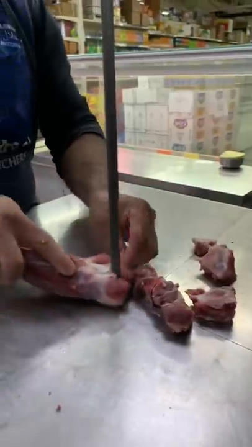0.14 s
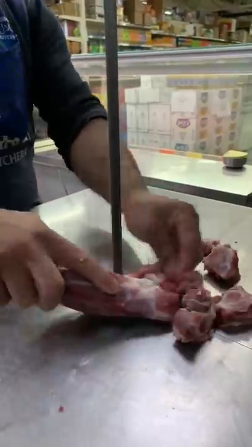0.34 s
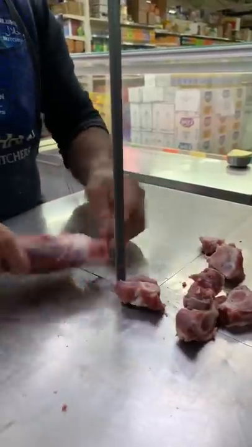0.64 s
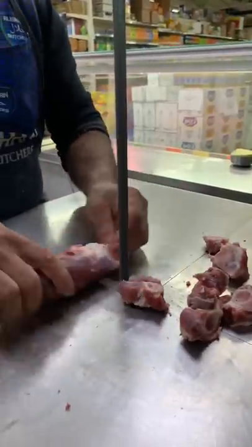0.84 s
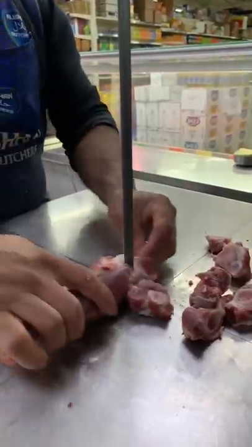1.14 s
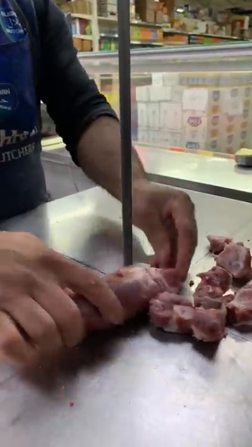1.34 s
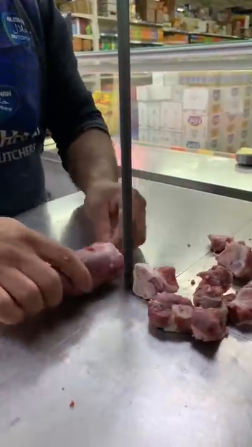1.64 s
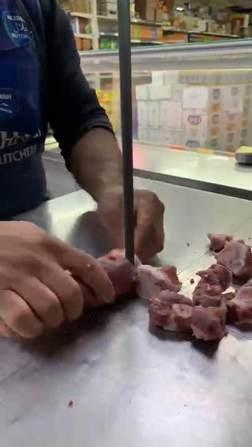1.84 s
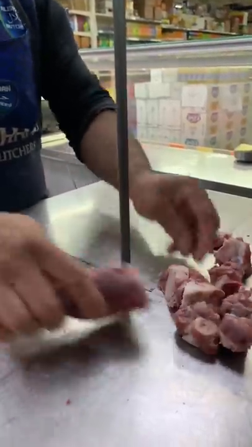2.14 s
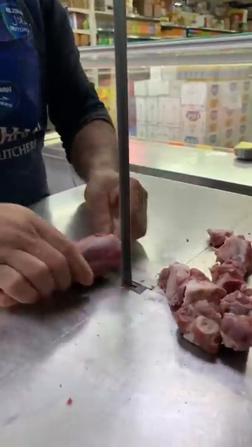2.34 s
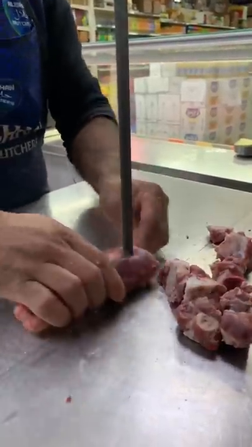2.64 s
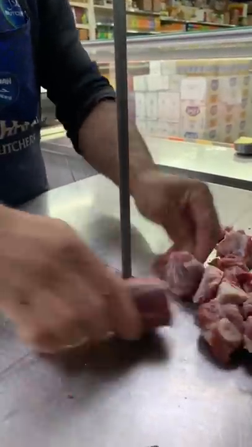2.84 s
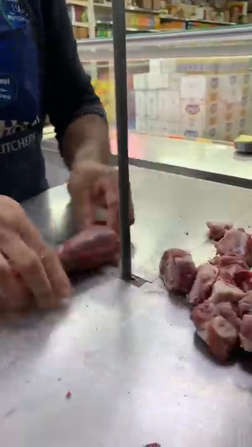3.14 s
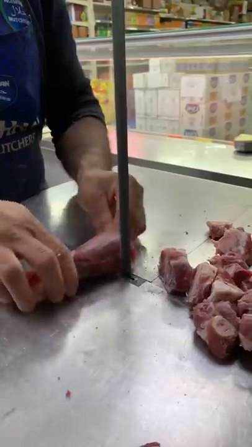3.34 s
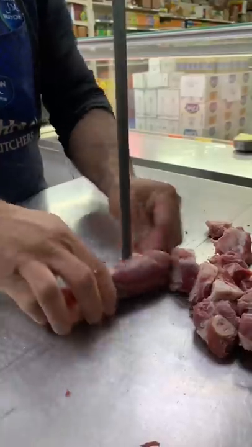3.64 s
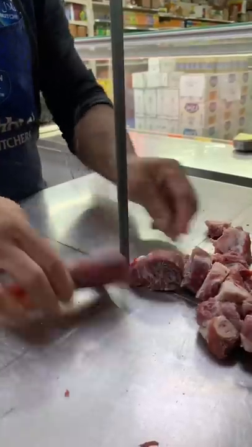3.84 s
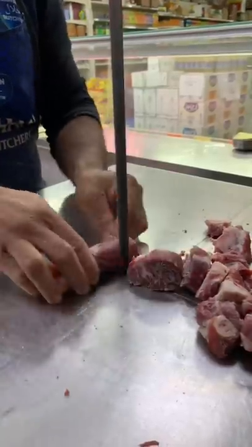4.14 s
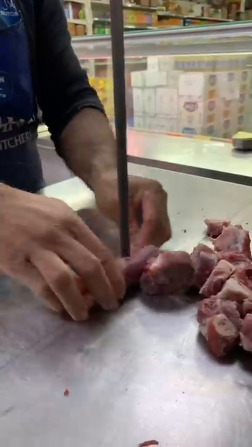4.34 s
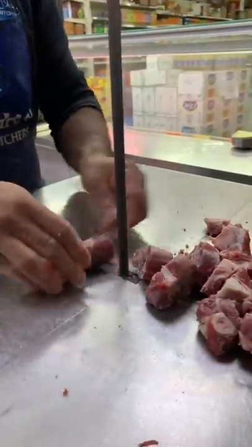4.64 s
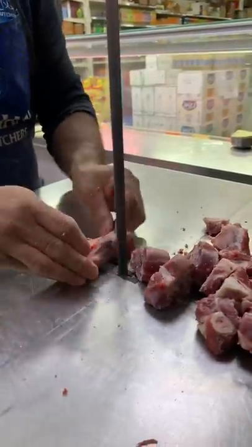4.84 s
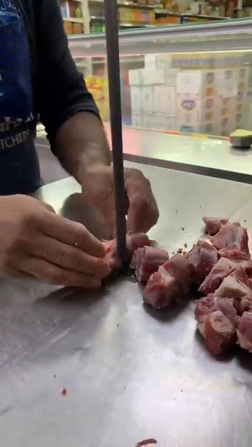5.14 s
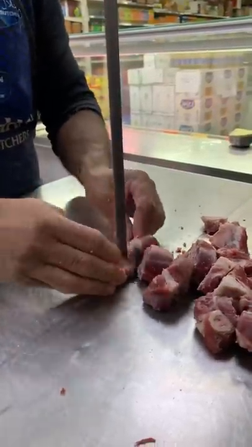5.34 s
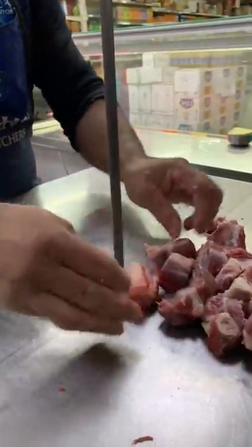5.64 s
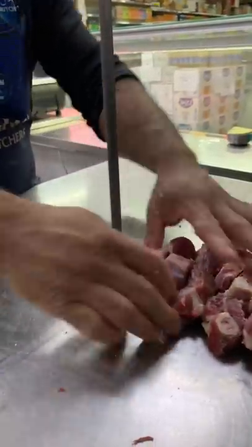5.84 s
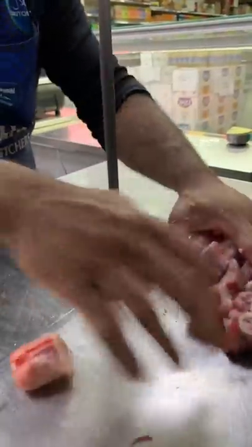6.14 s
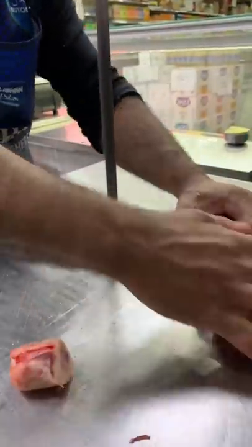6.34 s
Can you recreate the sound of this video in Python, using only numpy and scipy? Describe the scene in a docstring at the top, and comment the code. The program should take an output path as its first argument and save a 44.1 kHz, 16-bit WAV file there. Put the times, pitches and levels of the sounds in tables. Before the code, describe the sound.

Seven short, bright cuts through meat and bone come a little under a second apart on a running band saw in a butcher shop. The teeth rasp, whistle and screech while the motor dips; between cuts its hum, rattle and fluttering blade hiss return. Small cracks of bone, one scrape and two soft knocks on the steel table are mixed in. The pieces slide away with a light squeak as the saw runs on.

```python
"""A butcher's band saw is already running as a bony piece of meat meets the blade. The teeth rasp and
whistle, then screech in hard bone; the motor slows and the running sound sinks until the blade is clear.
Then the drive's hum and rattle return, with the blade swishing once a turn. Six more cuts follow, and
chips of bone snap throughout. After the second cut a loose piece scrapes the blade; in the fourth and
sixth a freed piece knocks on the table. Last, the pieces are swept aside with a squeak as the saw runs."""
import sys
import numpy as np
from scipy import signal
from scipy.fft import rfft, irfft
from scipy.io import wavfile
from scipy.ndimage import uniform_filter1d

SR = 44100
rng = np.random.default_rng(int(sys.argv[2]) if len(sys.argv) > 2 else 0)


def master(y):
    """Save y as 16-bit WAV."""
    cut = np.clip(np.atleast_2d(y).T, -1, 1)
    pcm = np.round(cut * 32767)  # scale
    wavfile.write(sys.argv[1], SR, pcm.astype(np.int16))


N = 285768
TIME, BINS_HZ = np.arange(N) / SR, np.fft.rfftfreq(N, 1 / SR)


# The seven cuts. Each row: start, time to reach hard bone, time to get through and time left in the slit,
# all in seconds, relative rasp and whistle levels in dB, speed lost in turns a second, dip in dB.
CUTS = [(0.0, 0.078, 0.19, 0.12, -29.5, -37, 0.39, 8.5), (0.987, 0.055, 0.22, 0.059, -29, -40.5, 0.31, 12),
        (1.704, 0.083, 0.19, 0.061, -30, -39, 0.4, 10), (2.471, 0.037, 0.2, 0.066, -30, -36.5, 0.31, 1.5),
        (3.36, 0.069, 0.24, 0.061, -31.5, -34, 0.34, 5.5),
        (4.137, 0.024, 0.25, 0.026, -31.5, -36.5, 0.31, 5), (5.05, 0.2, 0.37, 0.0059, -34.5, -37, 0.17, 9)]
# The teeth hit hard bone. Each row: start and length in seconds, relative rasp and knock levels in dB,
# screech in dB against the rasp.
BITES = [(0.072, 0.065, -19, -42, -4), (0.116, 0.046, -20, -53, 5.5), (0.147, 0.059, -23, -64, 5.5),
         (1.003, 0.06, -19.5, -35.5, -8), (1.025, 0.088, -22.5, -49, 9), (1.093, 0.086, -34.5, -47, 11),
         (1.18, 0.053, -23, -72, 3.5), (1.738, 0.069, -19, -31.5, -10), (1.756, 0.082, -17, -39.5, -12),
         (1.828, 0.12, -30, -52, 11.5), (2.558, 0.11, -26.5, -62, 2), (2.627, 0.066, -17, -50, -2),
         (3.504, 0.091, -26, -59, 1.5), (3.563, 0.065, -27, -47, 3), (4.288, 0.053, -25.5, -49, 2),
         (4.319, 0.049, -22, -36.5, -2), (5.192, 0.15, -29, -61, 5), (5.271, 0.084, -25.5, -49, 4),
         (5.329, 0.062, -20.5, -64, 4)]

def tooth_contact(break_s=0.022, bite_fall_s=0.034):
    """How strong rasp, knock, whistle and screech are: a growing push per cut, with hard bites on top."""
    parts = []
    for start, _, length, slit_s, rasp_db, whistle_db, _, _ in CUTS:
        through = start + length
        depth = progress(start, through)
        push = gain_of(0.5 * (depth - 1.5))
        sawing = push * swell(start, through - break_s, rise_s=0.013, fall_s=break_s)
        in_slit = gain_of(-9.5) * swell(through - break_s, through + slit_s, break_s, fall_s=0.016)
        rasp = gain_of(rasp_db) * sawing
        whistle = gain_of(whistle_db) * (np.sqrt(depth) * sawing + in_slit)
        parts.append((rasp, np.zeros(N), whistle, rasp))  # no knock; the screech follows the rasp
    for start, length, rasp_db, knock_db, screech_db in BITES:
        end = start + length
        bite = swell(start, end - bite_fall_s, rise_s=0.011, fall_s=bite_fall_s)
        bite *= gain_of(-4 * progress(start, end))  # a bite starts hard and eases
        rasp = gain_of(rasp_db) * bite
        parts.append((rasp, gain_of(knock_db) * bite, gain_of(-21.5) * rasp, gain_of(screech_db) * rasp))
    return [np.sqrt(sum(part ** 2 for part in layer)) for layer in zip(*parts)]


# The bright colour of the rasp. Each row: frequency in Hz, relative level in dB.
RASP_COLOUR = [(40, -40), (480, -12), (1000, -7), (2700, -1.5), (3900, 6), (4500, 8), (5000, 7.5),
               (6500, 10), (8500, 10), (10000, 11), (11500, 16), (12400, 15), (13600, 18), (14500, 18.5),
               (15700, 12), (16500, -20)]
# What rings as teeth bite bone. Each row: pitch in Hz, width in Hz, relative level in dB.
BITE_RINGS = [(460, 220, 10.5), (1230, 500, 3), (1870, 110, 13), (2430, 340, 10), (3190, 170, 8.5),
              (3670, 260, 11), (4200, 220, 14), (5600, 300, 5), (6570, 760, 8.5), (7550, 1300, 10),
              (8400, 600, 5)]
# What rings as hard bone splinters. Each row: pitch in Hz, width in Hz, relative level in dB.
CRUNCH_RINGS = [(1090, 790, 2.5), (1837, 170, 21.5), (2506, 70, 21), (3160, 390, 15), (4250, 290, -15),
                (4900, 200, 10), (5640, 160, -10)]

def cutting(turns, teeth_per_turn=74.42):
    """Every tooth tears off a chip: a gritty rasp, a coarse crunch and fuzzy tones from the tooth rate."""
    rasp, knock, whistle, screech = tooth_contact()
    slip = np.cumsum(0.05 * drift(22)) / SR  # the blade stretches and slips on its wheels
    teeth = teeth_per_turn * (turns + slip) + 0.032 * drift(89)
    rasp = rasp * gain_of(2.44 * drift(220))  # bone is hard and spongy by turns
    chips = grit(per_s=3000, spread_db=2.2, click_share=0.6)
    chips *= 1 + 0.3 * np.cos(2 * np.pi * teeth)  # one pulse for each tooth
    tearing = gain_of(-2.5) * coloured(chips, RASP_COLOUR) + gain_of(-13) * ringing(chips, BITE_RINGS)
    splinters = grit(per_s=500, spread_db=2.5, click_share=0.85)
    crunch = (gain_of(1) * knock + gain_of(-5) * whistle) * ringing(splinters, CRUNCH_RINGS)
    whistle = whistle * gain_of(2 * drift(70))  # the slit grips and lets go
    tones = gain_of(8) * knock * fuzzy_tone(teeth, width_hz=50)
    tones += gain_of(3) * whistle * fuzzy_tone(2 * teeth, width_hz=52)
    tones += gain_of(4.5) * whistle * fuzzy_tone(4 * teeth, width_hz=104)
    tones += screech * screeching(teeth)
    return stereo_noise(rasp * tearing + crunch) + stereo_tones(tones)


# The screech's tones, at 3 to 8 times the tooth rate. Each entry: level in dB against the screech.
SCREECH_TONES_DB = [-15, -11.5, -10.5, -9, -6, -0.5]

def screeching(teeth):
    """High multiples of the tooth rate each flare and fade as the blade twists in the bone."""
    sound = 0
    for multiple, db in enumerate(SCREECH_TONES_DB, 3):
        flare = gain_of(2.5 * drift(28))
        sound += gain_of(db) * unit_level(flare * fuzzy_tone(multiple * teeth, width_hz=70))
    return sound


# Bone chips, loose or carried round on the teeth. Each row: time in seconds, relative peak level in dB.
SNAPS = [(0.432, -18), (0.513, -17), (0.956, -17), (1.7585, -9), (2.006, -13.5), (2.413, -15), (2.967, -16),
         (3.46, -8), (4.0959, -11.5), (4.292, -9.5), (4.4978, -12.5), (5.503, -15.5), (5.5424, -13.5),
         (5.863, -15), (6.023, -10.5), (6.064, -14), (6.2663, -15)]

def chip_snaps(decay_s=0.0028):
    """A chip snaps against the blade with a short bright crack that also rings the housing."""
    bursts = sum(gain_of(db) * (TIME >= s) * np.exp(-abs(TIME - s) / decay_s) for s, db in SNAPS)
    noise = rng.standard_normal((2, N))
    crack = coloured(noise, BLADE_COLOUR) + gain_of(-13) * ringing(noise, HOUSING_RINGS)
    return stereo_noise(gain_of(-9) * bursts * crack)


def motor_load(idle_turns_per_s=24.945, sag_s=0.26):
    """Each cut slows the shaft until the blade is clear; the running sound dips from the hard bone on."""
    speed, dip_db = idle_turns_per_s, 0
    for start, to_bone, length, slit_s, _, _, speed_lost, depth_db in CUTS:
        clear = start + length + slit_s
        speed -= speed_lost * swell(clear - sag_s, clear, rise_s=sag_s, fall_s=0.24)
        dip_db += depth_db * swell(start + to_bone, clear, rise_s=0.091, fall_s=0.13)
    return speed, dip_db


# Slow changes in the running saw. Each row: time in seconds, relative rattle level in dB,
# how hard the blade is thrown against its guides in dB.
RUNNING_LEVELS = [(0, -34, -8), (0.6, -38, 15), (1.35, -37, -3), (1.7, -35.5, 5), (2.2, -36.5, 2),
                  (3.15, -38.5, 8), (4, -36.5, 7), (5.05, -37, -5), (5.65, -37, 0), (6.48, -34.5, 16)]
# How loud the hum is. Each row: time in seconds, relative level in dB.
HUM_LEVELS = [(0.0, -34), (0.11, -35), (0.22, -44.5), (0.45, -35.5), (0.99, -35.5), (1.23, -45.5),
              (1.44, -35.5), (1.89, -39), (1.93, -41), (2.26, -36), (2.65, -38), (3.59, -38), (3.61, -40),
              (3.86, -37), (4.46, -39.5), (4.55, -36.5), (5.48, -41.5), (5.59, -36), (5.83, -37.5),
              (6.39, -38.5), (6.43, -40), (6.48, -34)]

def running_saw(turns, dip_db):
    """One shaft drives the tones, the rattle and the blade's swish."""
    rattle_db, thrown_db = over_time(RUNNING_LEVELS)
    rattle_db -= dip_db
    hum_db = over_time(HUM_LEVELS)[0] + 1.3
    body = drive(turns, hum_db, rattle_db) + cabinet_rattle(turns, hum_db, rattle_db)
    return body + blade_swish(turns, rattle_db, thrown_db)


# How loud the deep drone is. Each row: time in seconds, relative level in dB.
DRONE_LEVELS = [(0.0, -33.5), (0.22, -45.5), (1.01, -34), (1.23, -63), (1.39, -38.5), (1.73, -33),
                (1.88, -55.5), (2.52, -39), (2.8, -57), (3.37, -39.5), (3.64, -52.5), (4.11, -37.5),
                (4.44, -47.5), (4.6, -40.5), (5.2, -42), (5.34, -55.5), (5.81, -38.5), (6.48, -38)]
# The motor's whine, which sinks under heavy cuts. Each row: time in seconds, level in dB.
WHINE_LEVELS = [(0.0, -35), (0.09, -32), (0.23, -53), (0.41, -33.5), (1.03, -34), (1.14, -46),
                (1.43, -36.5), (2.38, -38.5), (2.49, -35.5), (3.34, -42), (3.5, -38), (4.49, -37.5),
                (4.96, -40.5), (5.29, -35.5), (5.38, -44), (5.47, -40), (5.54, -35.5), (6.48, -38.5)]
# The tones of the hum. Each row: multiple of the shaft speed, level in dB against the hum.
HUM_TONES = [(2, -27), (3, -23.5), (4, -17.5), (7, -12.5), (8, -14), (10, -12), (11, -4), (12, -18.5),
             (15, -25)]
# Tones the housing favours. Each row: multiple of the shaft speed, level in dB against the rattle.
HOUSING_TONES = [(20, -23.5), (21, -23), (24, -20.5), (26, -18), (28, -20), (37, -16.5), (39, -21),
                 (41, -25), (47, -16.5), (53, -15), (55, -17.5), (79, -22)]
# A panel sings between cuts. Each row: start and end in seconds, multiple of the shaft speed, level in dB.
PANEL_SWELLS = [(0.393, 0.76, 37, -51), (1.407, 1.777, 41, -39.5), (1.41, 1.772, 37, -44),
                (3.038, 3.475, 37, -46.5), (4.567, 5.153, 37, -47.5), (4.545, 4.963, 7, -41),
                (5.535, 6.052, 7, -44.5), (5.808, 6.456, 37, -44.5)]

def drive(turns, hum_db, rattle_db):
    """Motor, belt and housing sound on multiples of the shaft speed."""
    drone = gain_of(over_time(DRONE_LEVELS)[0] - 0.16) * shaft_tone(turns, 5, waver=0.062, waver_hz=24.6)
    whine = gain_of(over_time(WHINE_LEVELS)[0]) * shaft_tone(turns, 17, waver=0.11, waver_hz=20)
    hum = sum(gain_of(db) * shaft_tone(turns, k, waver=0.24, waver_hz=14) for k, db in HUM_TONES)
    housing = sum(gain_of(db) * shaft_tone(turns, k, waver=0.68, waver_hz=18) for k, db in HOUSING_TONES)
    panels = 0
    for start, end, multiple, db in PANEL_SWELLS:
        level = gain_of(db) * window(start, end, fade_s=0.06)
        panels += level * shaft_tone(turns, multiple, waver=0.25, waver_hz=24.33)
    return stereo_tones(drone + whine + gain_of(hum_db) * hum + gain_of(rattle_db) * housing + panels)


# What rings in the steel housing. Each row: pitch in Hz, width in Hz, relative level in dB.
HOUSING_RINGS = [(560, 276, 4), (980, 320, -2), (1200, 153, 4.5), (1380, 170, 5), (1690, 170, 2),
                 (1930, 260, 4.5), (2345, 150, 8), (2510, 190, 8), (2720, 230, 3), (3095, 190, 7),
                 (3450, 400, -3), (3720, 170, 2), (4180, 120, -1.5)]
# The colour of the low rumble. Each row: frequency in Hz, relative level in dB.
RUMBLE_COLOUR = [(20, -46), (32, -30), (48, -16), (85, -1), (150, 2), (260, -0.5), (340, -9), (450, -4),
                 (700, -18), (1500, -59)]

def cabinet_rattle(turns, hum_db, rattle_db, repeat_share=0.22):
    """Bearings shake the cabinet: part of the chatter comes round alike on every turn."""
    one_turn = rng.standard_normal((2, 1800))
    repeating = np.array([np.interp(turns % 1, np.linspace(0, 1, len(row)), row) for row in one_turn])
    loose = grit(per_s=300, spread_db=1.5, click_share=0.28)
    chatter = np.sqrt(repeat_share) * unit_level(repeating) + np.sqrt(1 - repeat_share) * loose
    chatter = ringing(chatter * (1 + 0.032 * np.cos(2 * np.pi * turns)), HOUSING_RINGS)
    rumble = coloured(rng.standard_normal((2, N)), RUMBLE_COLOUR)
    return stereo_noise(gain_of(rattle_db) * chatter + gain_of(hum_db - 8.3) * rumble)


# The colour of the blade's hiss. Each row: frequency in Hz, relative level in dB.
BLADE_COLOUR = [(100, -35), (1000, -2), (3000, -4), (3800, -2), (5000, -3), (6700, 1), (8400, -0.5),
                (10000, -6.5), (11200, -2), (13000, -1.5), (13600, 3.5), (14400, -0.5), (15700, -4)]

def blade_swish(turns, rattle_db, thrown_db, rise_turns=0.026, slap_turns=0.13, rub_turns=0.56):
    """The blade hisses through its guides and hits them about once a turn: a short slap, then a rub."""
    laps = turns - 0.642 + 0.039 * drift(32)  # a hit lands at each whole number
    lap, since_hit = np.floor(laps).astype(int) + 1, laps % 1
    strength = gain_of(thrown_db + 4 * rng.uniform(-1, 1, 256)[lap])
    slap = gain_of(-10 + 5 * rng.uniform(-1, 1, 256)[lap]) * np.exp(-since_hit / slap_turns)
    rub = np.exp(-since_hit / rub_turns)
    stroke = (1 - np.exp(-since_hit / rise_turns)) * (rub + slap)
    pressure = unit_level((1 + strength * stroke) / (1 + gain_of(thrown_db) * stroke.mean()))
    flutter_db = drift(90)
    level_db = np.minimum(rattle_db, -37.5) + 6 + flutter_db  # follows the rattle, up to a limit
    hiss = coloured(grit(per_s=3000, spread_db=3, click_share=0.4), BLADE_COLOUR)
    return stereo_noise(gain_of(level_db) * pressure * hiss)


# A loose piece leans on the blade. Each row: start and end in seconds, level in dB.
SCRAPES = [(1.372, 1.778, -37.5)]
# What rings in that scrape. Each row: pitch in Hz, width in Hz, relative level in dB.
SCRAPE_RINGS = [(670, 250, 4), (993, 32, 10.5), (1110, 170, -9), (1620, 96, 10.5), (1760, 98, 5),
                (2120, 220, -6), (2490, 150, 1), (3400, 600, -10)]

def scrape():
    """A piece lying against the side of the blade scrapes in uneven slips."""
    level = sum(gain_of(db) * window(start, end, fade_s=0.035) for start, end, db in SCRAPES)
    slips = grit(per_s=600, spread_db=3, click_share=0.6) * gain_of(2 * drift(60))
    return stereo_noise(level * ringing(slips, SCRAPE_RINGS))


# A freed piece knocks softly on the steel table. Each row: time in seconds, level in dB.
KNOCKS = [(2.652, -34.5), (4.345, -36.5)]
# What rings in the knocked table. Each row: pitch in Hz, width in Hz, relative level in dB.
TABLE_RINGS = [(470, 190, 1), (680, 220, -11.5)]
# The pieces slide over the steel. Each row: start and end in seconds, level in dB.
SWEEPS = [(5.69, 6.05, -40)]

def pieces_on_table(rise_s=0.0043, decay_s=0.041, squeak_hz=2724, squeak_width_hz=85):
    """Freed pieces knock on the table and squeak as the hand sweeps them aside."""
    knocks = sum(gain_of(db) * progress(s, s + rise_s) * np.exp(-abs(TIME - s) / decay_s)
                 for s, db in KNOCKS)
    sweeps = sum(gain_of(db) * window(start, end, fade_s=0.05) for start, end, db in SWEEPS)
    noise = rng.standard_normal((2, N))
    squeak = ringing(noise, [(squeak_hz, squeak_width_hz, 0)])
    return stereo_noise(knocks * ringing(noise, TABLE_RINGS) + sweeps * squeak)


# How alike left and right are. Each row: frequency in Hz, likeness from 0 (unrelated) to 1 (the same).
STEREO_LIKENESS = [(100, .965), (280, .96), (420, .9), (650, .2), (1150, .7), (1700, .3), (2700, .55),
                   (3700, .4), (4800, .75), (7000, .92), (15000, .96)]

def stereo_noise(pair):
    """Blends two unrelated noises into what two nearby microphones pick up."""
    direct, scattered = rfft(pair)
    alike = np.clip(over_frequency(STEREO_LIKENESS), 0, 1)
    return left_and_right(direct, alike * direct + np.sqrt(1 - alike ** 2) * scattered)


def stereo_tones(x):
    """Tones reach both sides alike but for their timing and level."""
    spectrum = rfft(x)
    return left_and_right(spectrum, spectrum)


# How much louder the left side is. Each row: frequency in Hz, difference in dB.
LEFT_LOUDER = [(100, -.2), (400, -.6), (650, 1.3), (1200, -2.3), (2400, .5), (4500, 0)]
# How far the left wave runs ahead. Each row: frequency in Hz, lead in radians.
LEFT_LEAD = [(100, 0), (280, 0), (420, .7), (950, 1.1), (1380, 0), (2300, 2.2), (3200, 2.2), (3700, 1.5),
             (4900, 3.1), (5650, 3.7), (6900, 6.3), (9750, 9.4), (12400, 12.6), (14900, 15.7)]

def left_and_right(left, right):
    """Turns two spectra into stereo sound whose sides differ in timing and a little in level."""
    lean = gain_of(over_frequency(LEFT_LOUDER) / 2)
    lag = np.exp(-1j * over_frequency(LEFT_LEAD))
    return irfft(np.array([left * lean, right / lean * lag]), N)


def grit(per_s, spread_db, click_share):
    """Two rows of scattered, uneven clicks in a bed of hiss."""
    clicks = (rng.random((2, N)) < per_s / SR) * rng.choice([-1, 1], (2, N))
    clicks = clicks * gain_of(spread_db * np.minimum(rng.exponential(1, (2, N)), 4))
    hiss = rng.standard_normal((2, N))
    return np.sqrt(click_share) * unit_level(clicks) + np.sqrt(1 - click_share) * hiss


def fuzzy_tone(cycles, width_hz):
    """A rough tone: a narrow band of noise that follows the given cycles."""
    size = signal.lfilter([1], [1, -np.exp(-np.pi * width_hz / SR)], rng.standard_normal((2, N)))
    size = uniform_filter1d(size, size=30, axis=1)
    return unit_level(size[0] * np.cos(2 * np.pi * cycles) + size[1] * np.sin(2 * np.pi * cycles))


def shaft_tone(turns, multiple, waver, waver_hz):
    """One multiple of the shaft speed, wavering in size and timing."""
    angle = 2 * np.pi * (multiple * turns + rng.random())
    wave = (1 + waver * drift(waver_hz)) * np.cos(angle)
    return unit_level(wave + waver * drift(waver_hz) * np.sin(angle))


def ringing(x, rings):
    """Makes a sound ring at the given pitches, with no deep bass."""
    power = sum(gain_of(db) ** 2 / (1 + (2 * (BINS_HZ - hz) / width) ** 2) ** 3.9
                for hz, width, db in rings)
    bass_cut = BINS_HZ ** 2 / (BINS_HZ ** 2 + 250 ** 2)
    return unit_level(irfft(rfft(x) * np.sqrt(power) * bass_cut, N))


def coloured(x, colour):
    """Shapes a sound's lows and highs by a colour table."""
    return unit_level(irfft(rfft(x) * gain_of(over_frequency(colour)), N))


def drift(hz):
    """A random wander of size one that changes about hz times a second."""
    points = rng.standard_normal(8192)
    return unit_level(np.interp(TIME * hz, np.arange(len(points)), points))


def swell(start, end, rise_s, fall_s):
    """Rises from start, holds at one, and falls away after end."""
    return np.clip(np.minimum((TIME - start) / rise_s, 1 + (end - TIME) / fall_s), 0, 1)


def window(start, end, fade_s):
    """One between two moments, with sloping edges."""
    return np.clip(np.minimum(TIME - start, end - TIME) / fade_s, 0, 1)


def progress(start, end):
    """Runs from zero to one between two moments."""
    return np.clip((TIME - start) / (end - start), 0, 1)


def over_time(rows):
    """Joins a table's rows into one curve over time for each value column."""
    seconds, *columns = np.transpose(rows)
    return [np.interp(TIME, seconds, column) for column in columns]


def over_frequency(rows):
    """Joins a table's rows into a curve over frequency, on a log scale."""
    hz, value = np.transpose(rows)
    return np.interp(np.log(BINS_HZ + 1), np.log(hz + 1), value)


def gain_of(db):
    """Decibels as a factor."""
    return 10 ** (np.asarray(db) / 20)


def unit_level(x):
    """Scales a signal to an average power of one."""
    return x / np.sqrt(np.mean(x ** 2) + 1e-20)


def scene():
    """The running saw and its cuts follow the same shaft; the small noises go on top."""
    speed, dip_db = motor_load()
    turns = np.cumsum(speed) / SR
    return running_saw(turns, dip_db) + scrape() + cutting(turns) + chip_snaps() + pieces_on_table()


def record(dry):
    """Removes the highest treble, above 15700 Hz."""
    low_pass = signal.firwin(801, 15700, window=("kaiser", 9), fs=SR)
    return signal.oaconvolve(dry, low_pass[None], "same", axes=1)


dry = scene()
out = record(dry)
master(out)
```